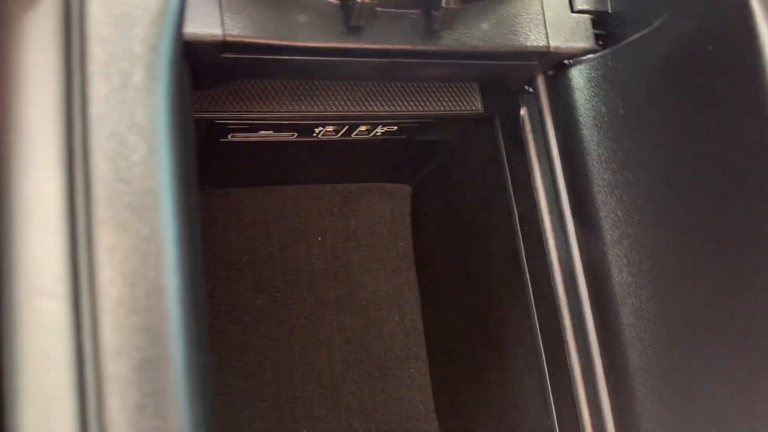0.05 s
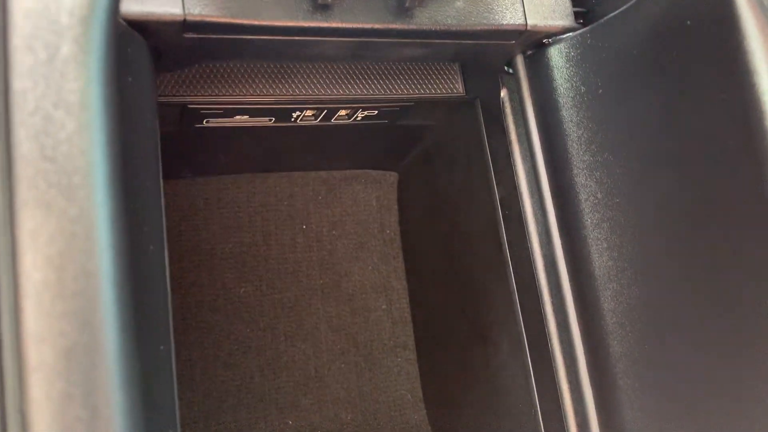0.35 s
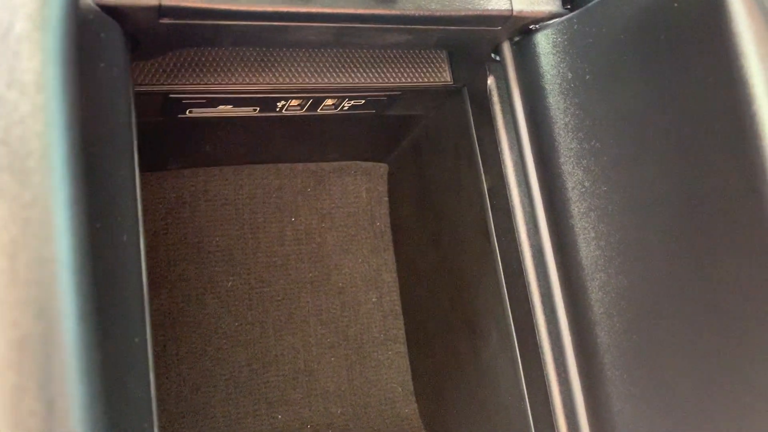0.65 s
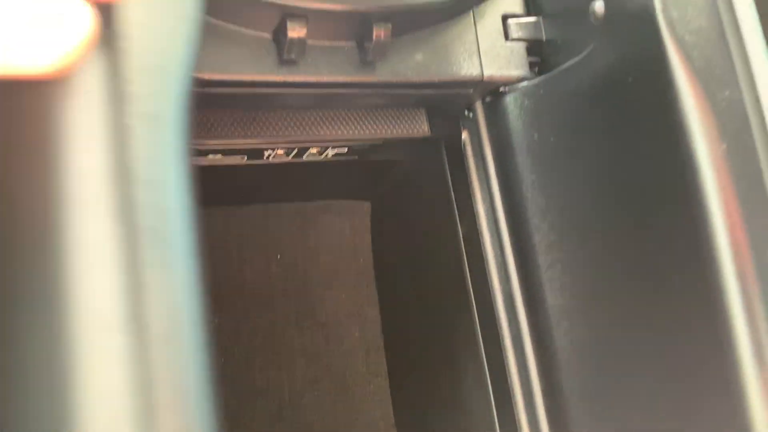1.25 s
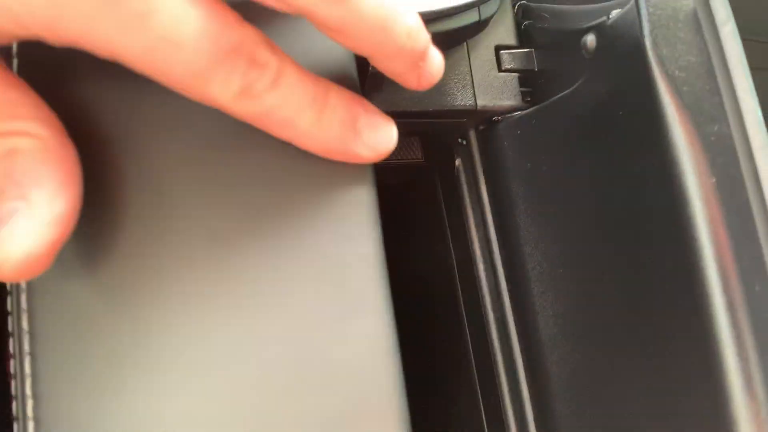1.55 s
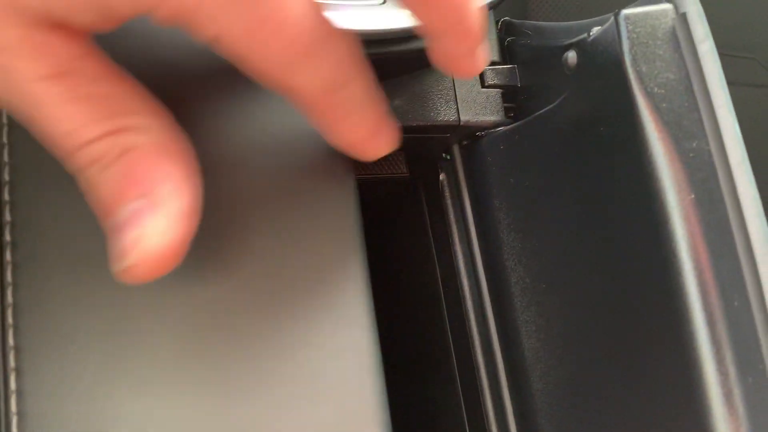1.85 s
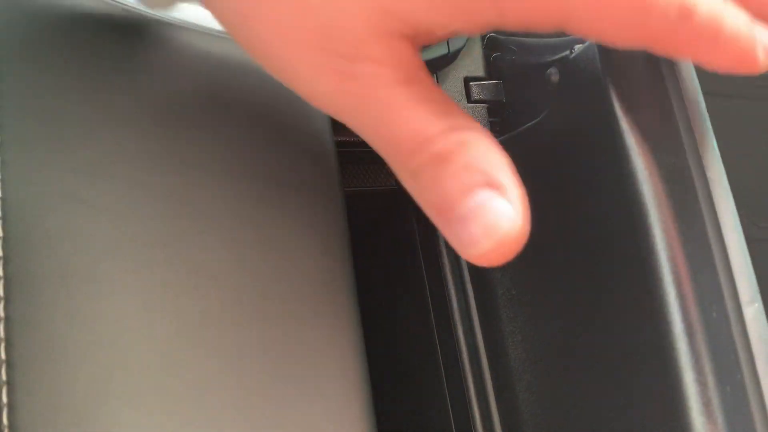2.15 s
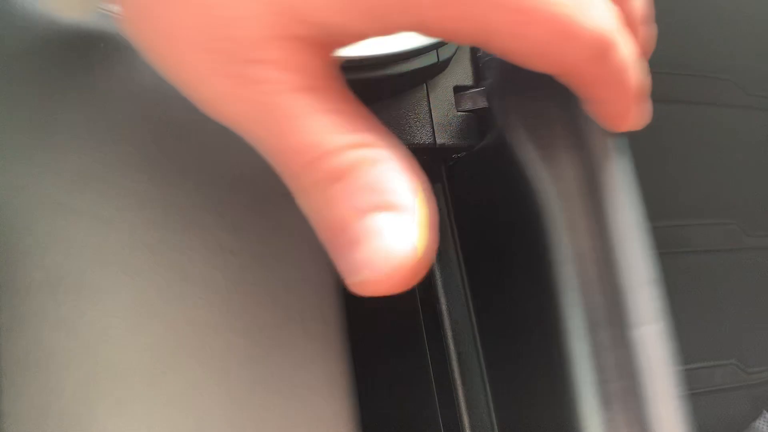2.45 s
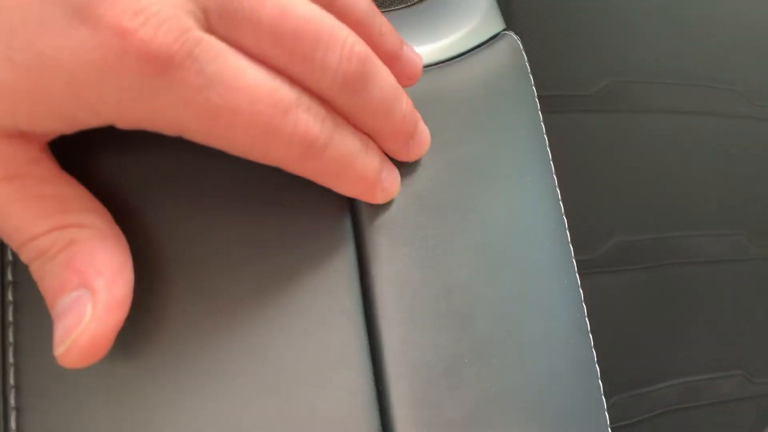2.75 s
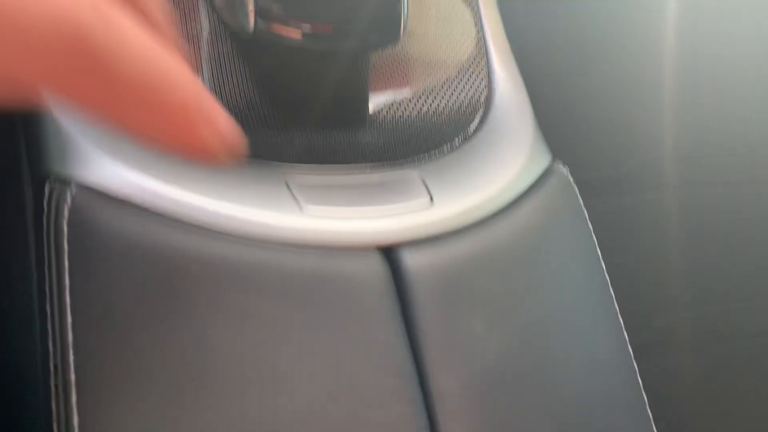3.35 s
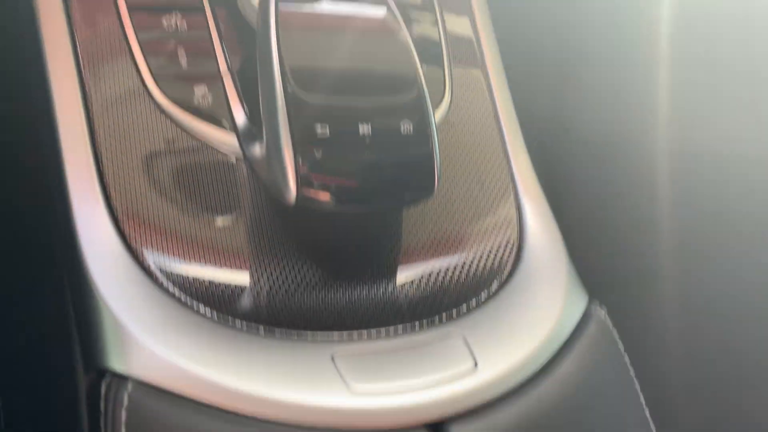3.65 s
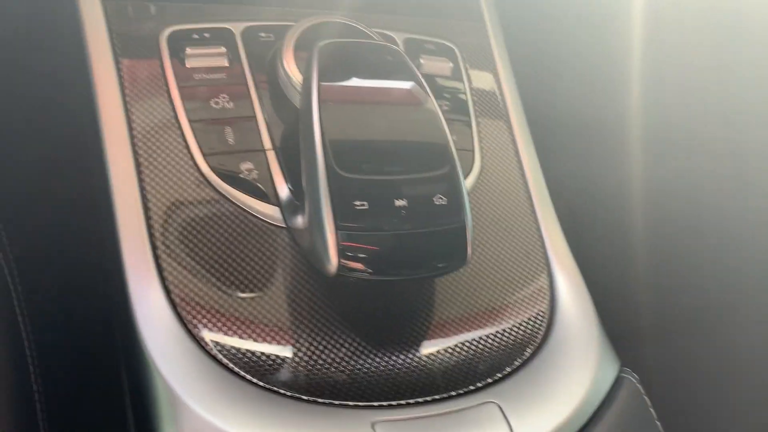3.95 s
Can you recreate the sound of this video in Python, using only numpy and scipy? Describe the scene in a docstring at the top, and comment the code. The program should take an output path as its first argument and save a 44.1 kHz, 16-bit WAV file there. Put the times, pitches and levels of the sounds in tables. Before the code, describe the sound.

Two sharp latch clacks as a hand closes a car's console lids, over faint rumble.

```python
"""Two padded lids of a car's centre console are pushed shut close by, left then right.
Each lid first touches its sprung catch, slides over it, then snaps home with a clack
that the small cabin soon swallows. A hand and sleeve brush the padding and knock the
trim lightly over a low cabin rumble."""
import sys
import numpy as np
from scipy import signal
from scipy.fft import rfft, irfft
from scipy.io import wavfile
from scipy.ndimage import uniform_filter1d

SR = 44100
rng = np.random.default_rng(int(sys.argv[2]) if len(sys.argv) > 2 else 0)


def dump_mix(stems):
    """Bounce the given channels to the path in sys.argv[1] as a 16-bit WAV at rate SR."""
    frames = np.atleast_2d(stems).T  # one column per channel
    limited = np.clip(frames, -1, 1)  # hard clip at full scale
    pcm = np.round(limited * 32767).astype(np.int16)
    wavfile.write(sys.argv[1], SR, pcm)


N = 176400
TIME, RING = np.arange(N) / SR, np.arange(SR // 2) / SR  # seconds: whole scene, one hit
RING_HZ = np.fft.rfftfreq(len(RING), 1 / SR)

# Tone of each lid's clack. Each row: frequency in Hz, level in dB.
LEFT_CLACK = [(60, -5), (150, -16), (300, -7.5), (560, -12), (1100, -6), (1700, -11.5), (2500, -10.5),
              (3200, -13), (5200, -14.5), (8300, -17), (9500, -23), (13000, -25), (15500, -28.5)]
RIGHT_CLACK = [(80, -15.5), (280, -9), (450, -11), (650, -12), (950, -8.5), (1400, -8), (1800, -11),
               (3000, -7.5), (5200, -13), (8300, -12.5), (9500, -18), (11500, -21), (15500, -28)]
# Ring of each lid. Each row: pitch in Hz, level in dB, t60 in seconds.
LEFT_RING = [(61, -44.5, 0.15), (204, -52.5, 0.39), (337, -35.5, 0.076), (387.5, -32, 0.095),
             (431.6, -40, 0.13), (791, -46, .07), (1087, -34.5, 0.059), (1175, -26, 0.03),
             (1274, -24.5, 0.035), (1569.8, -42, 0.092), (1880.3, -39, 0.073), (1968, -65, 0.465),
             (2350, -35, 0.057), (2640, -37, 0.062), (3901, -37.5, 0.065), (8455, -39.5, 0.054)]
RIGHT_RING = [(189, -49, 0.27), (692, -33.5, 0.081), (818, -48, 0.145), (1252, -37, 0.0986),
              (1394, -35, 0.047), (1465, -40, 0.0584), (2224, -38, 0.055), (2657, -34.5, 0.0475),
              (2880, -39.5, .06), (3066, -29.5, 0.043), (3160, -43.5, 0.0455), (3637, -48.5, 0.068),
              (3927, -32.5, 0.044), (4510, -39.5, 0.065), (7375, -41, 0.043), (8640, -41, 0.063)]
# Tail of console and cabin. Each row: band in Hz, t60 in seconds.
TAIL = [(100, 0.184), (300, 0.18), (700, 0.12), (1400, 0.089), (3000, 0.055), (7000, 0.062), (15000, 0.05)]
# A lid meets its catch. Each row: start in seconds, then knock, click and spring levels in dB.
CATCH_HITS = [(1.616, -45.5, -57.5, -52.5), (2.751, -48.5, -60, -51.5)]
# Tone of the catch's knock and click. Each row: frequency in Hz, level in dB.
KNOCK_TONE = [(100, -9), (300, -1.5), (450, -5.5), (750, -10.5), (1180, 2), (1600, -11.5), (2600, -6),
              (4000, -22), (8000, -39), (15500, -56)]
CLICK_TONE = [(100, -39), (1500, -2.5), (4000, -6), (5600, 1), (7500, -2.5), (9500, -20), (15500, -20)]
# The left latch scrapes over its catch. Each row: centre in Hz, half-width in Hz, level in dB.
SCRAPE_BANDS = [(1240, 360, -63.5), (2570, 350, -66.5), (6200, 600, -75)]
# The right lid rubs along the left. Each row: start in seconds, length in seconds, level in dB.
RUBS = [(2.83, .05, -68), (2.886, 0.14, -60.5)]
# Knocks on the padding. Each row: start in seconds, pitch in Hz, level in dB, t60 in seconds.
PAD_THUDS = [(.262, 290, -59, 0.081), (1.139, 420, -54, 0.11), (1.222, 344.7, -59, 0.142),
             (1.745, 323, -52, 0.14), (1.863, 228, -57.5, 0.17), (2.363, 388.8, -53, 0.11),
             (2.413, 364, -49.5, .12), (2.82, 210, -44.5, 0.066), (3.172, 216, -56.5, 0.17),
             (3.939, 282, -50.5, 0.04)]
# Trim ticks. Each row: start in seconds, level in dB, centre in Hz, width in octaves, t60 in seconds.
TRIM_TICKS = [(0.126, -73.5, 1500, 0.63, 0.068), (1.138, -64, 1500, 1.36, 0.058),
              (1.223, -77, 1500, 0.97, 0.055), (1.889, -72.5, 2180, 1, 0.087),
              (2.475, -73, 1550, 0.16, .25), (2.48, -74.5, 7400, 0.28, 0.19), (2.813, -69, 4000, 0.68, .06),
              (3.697, -47.5, 11300, 0.52, 0.0086), (3.9393, -52, 870, 1.39, 0.019)]
# Fader curve of the sleeve. Each row: time in seconds, level in dB.
SLEEVE_FADER = [(0, -77.5), (.3, -83.5), (.85, -87.5), (1.1, -77), (1.3, -78.5), (1.6, -74.5), (1.8, -79),
                (2.08, -72), (2.28, -71.5), (2.37, -80.5), (2.6, -74), (2.73, -74.5), (2.86, -78.5),
                (3.13, -75), (3.28, -69.5), (3.45, -72.5), (3.6, -77.5), (4, -76.5)]
# Tone of lid rub, sleeve, palm and rumble. Each row: frequency in Hz, level in dB.
RUB_TONE = [(100, 10.5), (190, 12.5), (270, 10.5), (450, -8), (900, -6), (1500, -12), (2200, -6),
            (3300, -20), (5000, -20), (9000, -41), (15000, -41.5)]
SLEEVE_TONE = [(200, 12), (1000, 5), (2500, -0.5), (4500, -4), (7300, -3.5), (10000, -9), (15500, -16.5)]
PALM_TONE = [(100, 4.5), (300, 4), (900, 2), (1900, 0.5), (4000, -7.5), (8000, -15), (15500, -40)]
RUMBLE_TONE = [(2, 30), (13, 24), (20, 19.5), (30, 2), (60, 1), (100, -4.5), (160, -13), (350, -15.5),
               (600, -20.5), (1100, -24), (2000, -40.5), (3500, -45.5), (8000, -47.5), (16000, -45.5)]

SPRING_HZ, SPRING_T60_S = 1260, 0.18
SCRAPE_START_S, SCRAPE_LENGTH_S = 1.637, 0.11
PALM_START_S, PALM_RISE_S, PALM_FADE_DB_PER_S, PALM_DB = 3.113, 0.18, 10.5, -67.5
DRONE_START_S, DRONE_RISE_S, DRONE_HZ, DRONE_DB = 3.367, 0.118, 121.9, -67.5
RUMBLE_DB, HIGH_CUT_HZ = -44.5, 15800


def lids():
    """The left lid clacks shut, then the right."""
    out = np.zeros(N)
    add(out, 1.6877, snap(LEFT_CLACK, LEFT_RING, db=-29, modes_db=-2.0,
                          hold_s=0.0037, first_db=-9.5, rise_s=0.0044))
    add(out, 3.0096, snap(RIGHT_CLACK, RIGHT_RING, db=-28.5, modes_db=-2.5,
                          hold_s=0.0082, first_db=0.5, rise_s=0.0078))
    return out


def snap(tone, modes, db, modes_db, hold_s, first_db, rise_s):
    """A latch snaps home and rings its lid."""
    ring = sum(mode(*row, rise_s) for row in modes)
    return amp(db) * clatter(tone, hold_s, first_db) + amp(modes_db) * ring


def clatter(tone, hold_s, first_db):
    """Dense plastic modes and close reflections last while the latch chatters, then die band by band."""
    white = rfft(rng.standard_normal(len(RING)))
    attack = amp(first_db * np.maximum(1 - RING / hold_s, 0))
    burst = 0
    for centre, t60 in TAIL:
        band = curve([(hz, hz == centre) for hz, _ in TAIL], RING_HZ)
        burst += irfft(white * band) * attack * amp(-60 * np.maximum(RING - hold_s, 0) / t60)
    spectrum = rfft(burst)
    flat = spectrum / np.sqrt(uniform_filter1d(abs(spectrum) ** 2, size=120) + 1e-12)
    hit = irfft(flat * amp(curve(tone, RING_HZ))) * (RING < RING[-1] / 2)
    return hit / np.sqrt(np.sum(hit ** 2) / (SR / 100))  # energy of 10 ms at rms 1


def mode(hz, db, t60, rise_s):
    """One resonance swells while it is driven, then rings out."""
    envelope = np.minimum(RING / rise_s, 1) * amp(db - 60 * np.maximum(RING - rise_s, 0) / t60)
    return envelope * np.sin(2 * np.pi * (hz * RING + rng.random()))


def catches():
    """Each lid touches its catch: a knock, a click and a ping from the spring."""
    out = np.zeros(N)
    for start, knock_db, click_db, spring_db in CATCH_HITS:
        add(out, start, amp(knock_db) * clatter(KNOCK_TONE, hold_s=0.007, first_db=-14))
        add(out, start, amp(click_db) * clatter(CLICK_TONE, hold_s=0.0037, first_db=-3))
        add(out, start, mode(SPRING_HZ, spring_db, SPRING_T60_S, rise_s=0.0024))
    return out


def friction():
    """The left latch scrapes over its catch; the right lid rubs its neighbour on the way down."""
    out = np.zeros(N)
    size = int(SCRAPE_LENGTH_S * SR)
    for hz, width, db in SCRAPE_BANDS:
        peak = [(hz / 3, -45), (hz - width, -12), (hz, 0), (hz + width, -12), (hz * 2, -45)]
        add(out, SCRAPE_START_S, amp(db) * noise(peak, size) * signal.windows.tukey(size, .2))
    for start, length, db in RUBS:
        size = int(length * SR)
        add(out, start, amp(db) * noise(RUB_TONE, size) * signal.windows.tukey(size, .3))
    return out


def handling():
    """The hand draws dull thuds from the padding and small ticks from the trim."""
    out = np.zeros(N)
    for start, hz, db, t60 in PAD_THUDS:
        tone = [(hz / 4, -14), (hz, 0), (hz * 1.6, -11), (hz * 3.5, -30), (hz * 16, -60)]
        envelope = np.minimum(RING / 0.00365, 1) * amp(db - 6 - 60 * RING / t60)
        body = envelope * noise(tone, len(RING))
        add(out, start, body + mode(hz, db - 2.5, t60, rise_s=0.0037))
    for start, db, centre, octaves, t60 in TRIM_TICKS:
        bell = np.exp(-.5 * (np.log2((RING_HZ + 1) / centre) / octaves) ** 2)
        tick = unit(irfft(rfft(rng.standard_normal(len(RING))) * bell))
        add(out, start, tick * amp(db - 60 * RING / t60))
    return out


def brushing():
    """A sleeve brushes the padding and the palm slides off the shut lids: a fine, uneven hiss."""
    sleeve = amp(np.interp(TIME, *np.transpose(SLEEVE_FADER))) * noise(SLEEVE_TONE, N)
    since = TIME - PALM_START_S
    palm_db = PALM_DB - PALM_FADE_DB_PER_S * np.maximum(since - PALM_RISE_S, 0)
    palm = np.clip(since / PALM_RISE_S, 0, 1) * amp(palm_db) * noise(PALM_TONE, N)
    grip_db = 0.97 * unit(uniform_filter1d(rng.standard_normal(N), size=700))
    return (sleeve + palm) * amp(grip_db)


def cabin():
    """A bed of low rumble; a faint wavering drone fades in near the end."""
    drone = noise([(DRONE_HZ * .85, -60), (DRONE_HZ, 0), (DRONE_HZ * 1.15, -60), (DRONE_HZ * 2, -100)], N)
    fade_in = np.clip((TIME - DRONE_START_S) / DRONE_RISE_S, 0, 1)
    return amp(RUMBLE_DB) * noise(RUMBLE_TONE, N) + amp(DRONE_DB) * drone * fade_in


def noise(tone, size):
    """Steady noise through an EQ curve, at rms 1."""
    eq = amp(curve(tone, np.fft.rfftfreq(size, 1 / SR)))
    return unit(irfft(rfft(rng.standard_normal(size)) * eq, size))


def curve(points, hz):
    """Joins points along a log-frequency axis."""
    point_hz, value = np.transpose(points)
    return np.interp(np.log(hz + 1), np.log(point_hz + 1), value)


def amp(db):
    """Decibels to gain."""
    return 10 ** (np.asarray(db) / 20)


def unit(x):
    """Scales to rms 1."""
    return x / np.sqrt(np.mean(x ** 2) + 1e-20)


def add(mix, start_s, sound):
    """Drops a sound into the mix on its cue."""
    part = mix[round(start_s * SR):][:len(sound)]
    part += sound[:len(part)]


def scene():
    """Mono mix of lids, hand and cabin."""
    return (lids() + catches() + friction() + handling() + brushing() + cabin())[None]


def record(dry):
    """A steep high cut takes off the very top."""
    high_cut = signal.firwin(401, HIGH_CUT_HZ, window=("kaiser", 8), fs=SR)
    return signal.oaconvolve(dry, high_cut[None], "same")


dry = scene()
out = record(dry)
dump_mix(out)
```